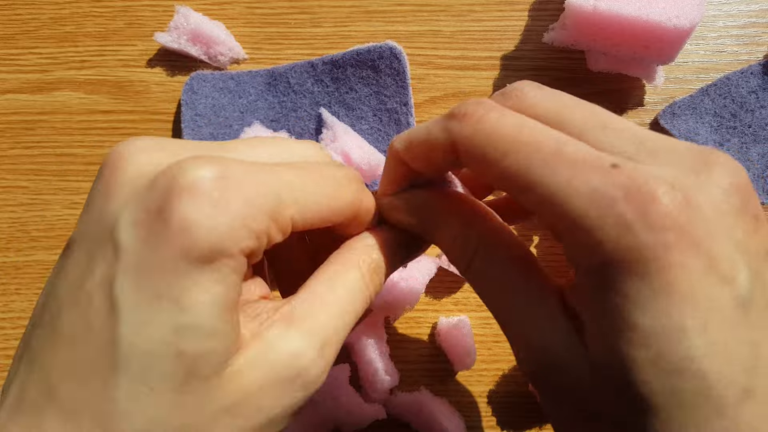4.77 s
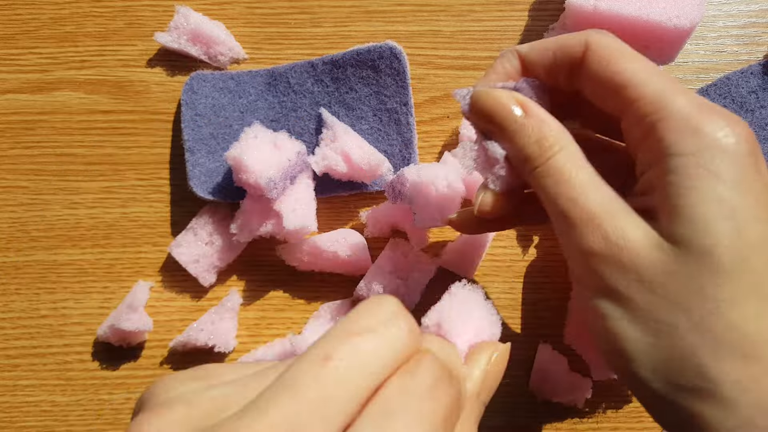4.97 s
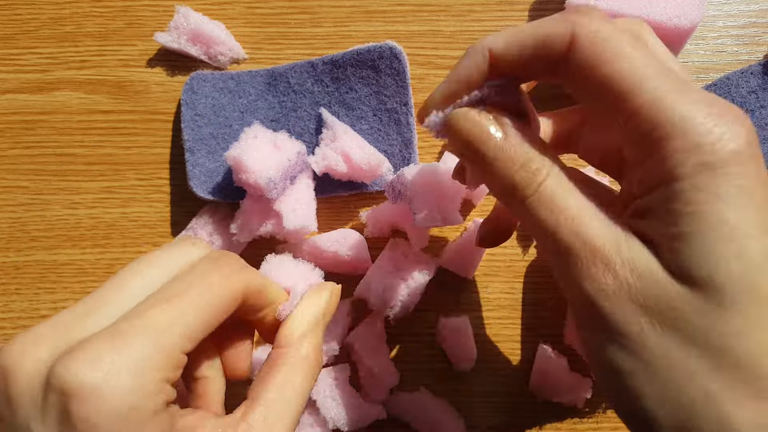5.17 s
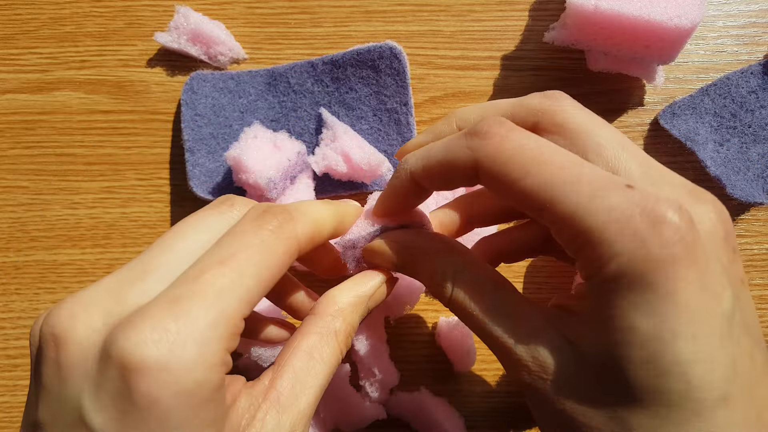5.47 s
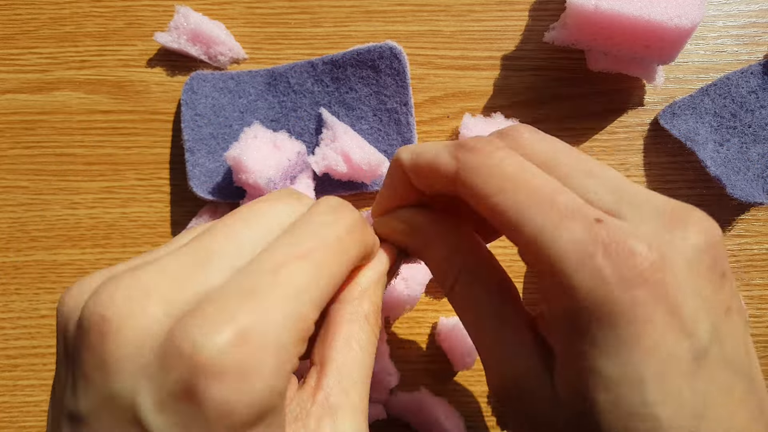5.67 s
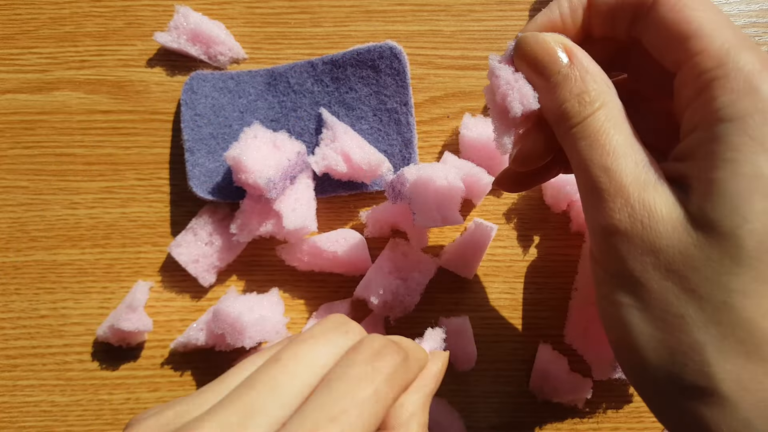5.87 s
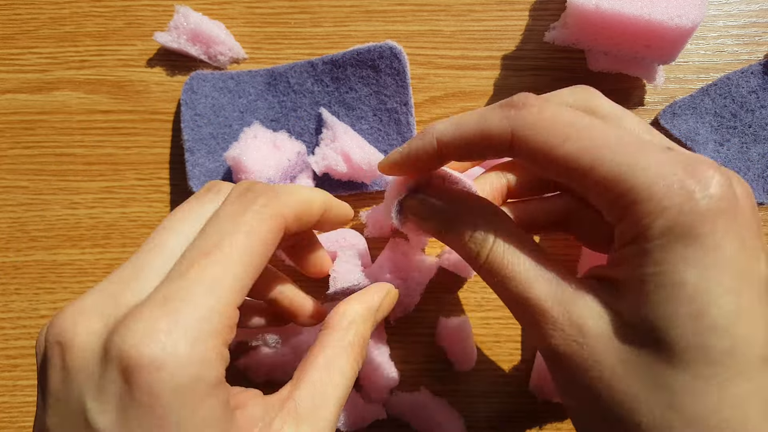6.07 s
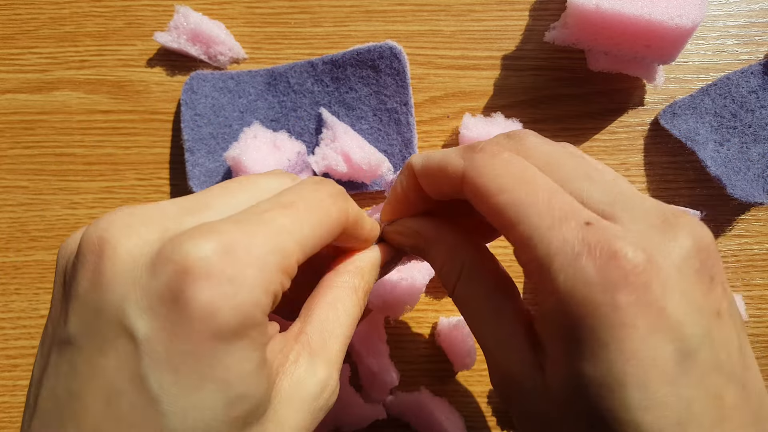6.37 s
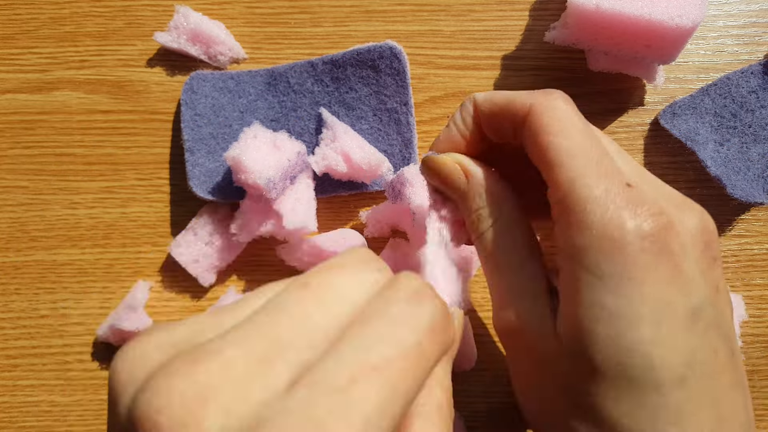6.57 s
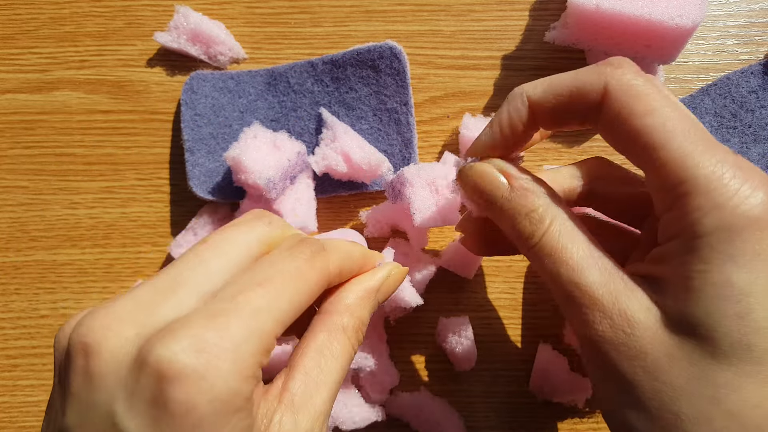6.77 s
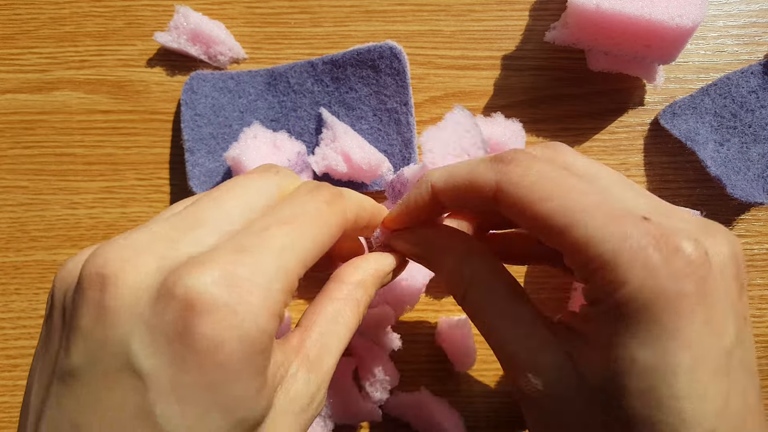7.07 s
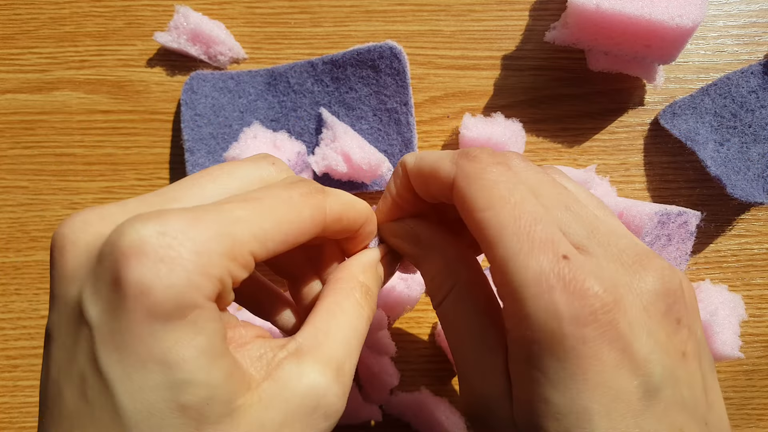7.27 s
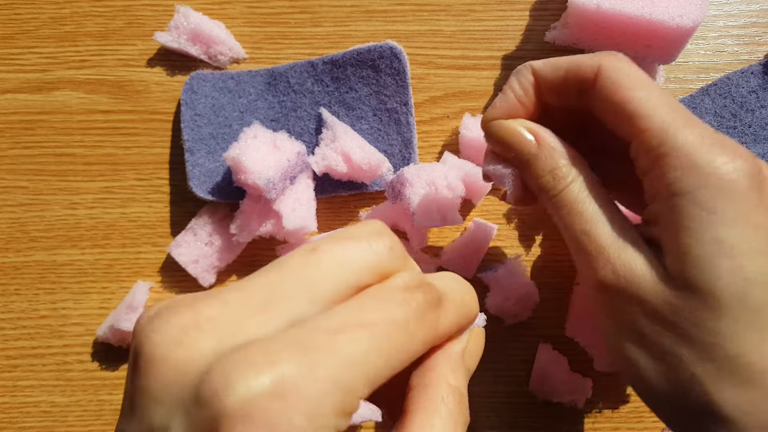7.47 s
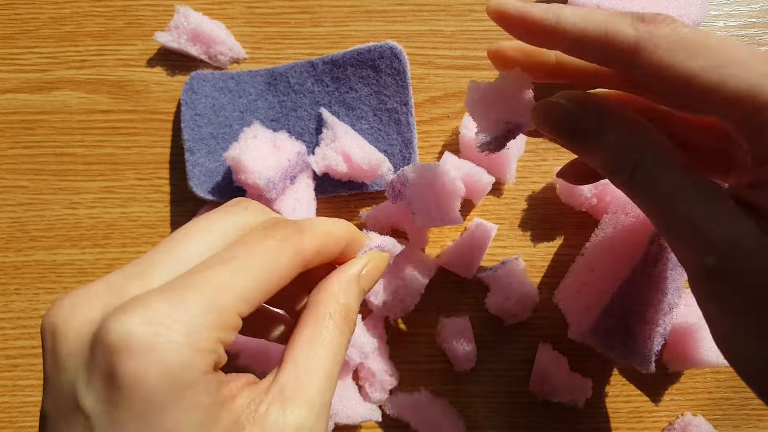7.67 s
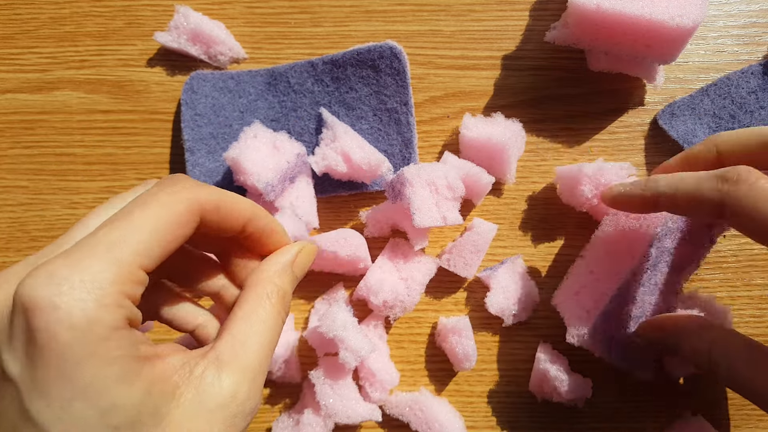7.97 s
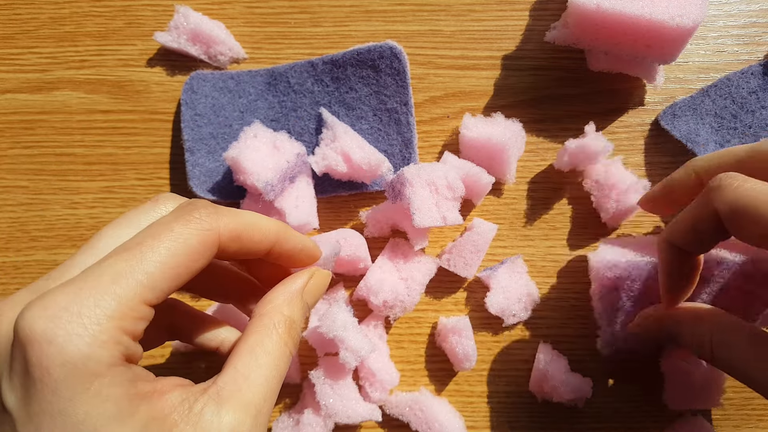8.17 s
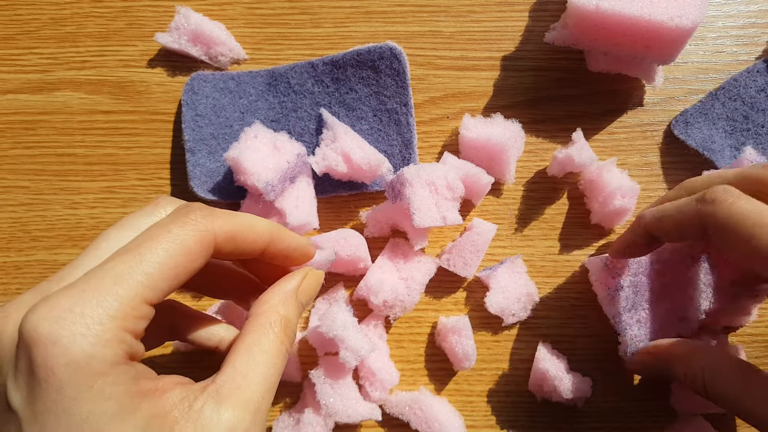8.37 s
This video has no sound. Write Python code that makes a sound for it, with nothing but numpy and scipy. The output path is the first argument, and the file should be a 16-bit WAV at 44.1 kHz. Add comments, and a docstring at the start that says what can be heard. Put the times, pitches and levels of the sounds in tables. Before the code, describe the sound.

Brief sharp rips of dry foam, four in quick succession, then spaced singly, with soft creaky handling over quiet low room rumble.

```python
"""At a wooden table in a quiet room, fingers tear small chunks off dry sponge foam close to a stereo microphone.
Each rip is a dense crackle: random impulses excite short resonances, high for cell walls, lower for coarser parts.
The coarser parts join as the tear proceeds, so the sound darkens; dull jerks are damped modes of hands and table.
Between rips the fingers squeeze and shift foam: fainter crackle and two thin squeaks of narrow-band noise.
Behind lie band-filtered room rumble and hiss, a steady motor hum and a far engine, a sine of gliding pitch."""
import sys
import numpy as np
from scipy import signal
from scipy.io import wavfile

SR = 44100
rng = np.random.default_rng(int(sys.argv[2]) if len(sys.argv) > 2 else 0)


def field_ratio(decibels):
    """Amplitude ratio for a level in dB (20 dB per decade); scalars and array-likes work."""
    return 10 ** (np.asarray(decibels, dtype=float) / 20)


def transcribe(signal):
    """Save signal, clipped to [-1, 1], as a 16-bit WAV file at the path in sys.argv[1]."""
    frames = np.atleast_2d(signal).T
    limited = np.clip(frames, -1, 1)
    pcm = np.round(limited * 32767).astype(np.int16)
    wavfile.write(sys.argv[1], SR, pcm)


N = 376173

# Spectral density of the room air and microphone hiss: (f/Hz, relative level/dB)
AIR_SPECTRUM = [(24, -27), (40, 4), (101, -1), (175, -3.5), (267, -9), (398, -9), (821, -13), (10500, -30),
                (13100, -27.5), (15600, -33)]
# Left-right correlation of the background: (f/Hz, correlation)
AIR_CORRELATION = [(60, .25), (250, .5), (2500, 0.0)]
# Noise bands of a steady motor: (f/Hz, bandwidth/Hz, level/dB)
HUM_BANDS = [(41.5, 7, -60.5), (90.8, 7.4, -58.5), (267.5, 62, -60.5)]
# Gliding note of a far engine: (t/s, f/Hz, level/dB)
ENGINE_GLIDE = [(2.5, 123.4, -65), (3.81, 121.1, -59), (4.23, 104, -65), (4.6, 113, -67), (5.2, 100, -70.5),
                (6.15, 122.2, -59), (6.5, 113.1, -50), (6.93, 126, -70), (7.39, 103.4, -57.5),
                (7.82, 119.3, -64), (8.23, 110.8, -54), (8.53, 124.3, -63)]
# A strained strut slips and sings: (t/s, length/s, f/Hz, onset level/dB)
STRUT_SQUEAKS = [(0.108, .09, 4180, -48.5), (0.787, 0.16, 2250, -48.5)]
# Fingers squeeze and shift foam: (peak t/s, rise/s, fall/s, cell wall level/dB, finger rub level/dB)
FOAM_SQUEEZES = [(0.0, .01, 0.033, -45, -40.5), (0.112, 0.028, 0.13, -53, -55),
                 (0.819, 0.06, 0.063, -53, -42.5), (1.054, 0.14, 0.078, -49.5, -52),
                 (1.269, 0.076, 0.041, -60.5, -55), (1.495, 0.018, 0.086, -47, -43),
                 (1.59, 0.09, 0.055, -49.5, -46.5), (1.756, 0.18, 0.071, -52.5, -59),
                 (2.39, .1, .06, -52.5, -55), (2.49, 0.061, 0.067, -51, -54),
                 (2.757, 0.022, 0.12, -50, -45), (3.07, 0.21, 0.057, -52, -59.5),
                 (3.371, .04, 0.049, -45, -60), (3.399, 0.049, 0.033, -44, -47),
                 (3.44, 0.026, 0.13, -52.5, -53), (3.552, 0.052, 0.027, -55, -53),
                 (3.705, 0.041, 0.042, -52, -41), (3.85, 0.24, 0.03, -55.5, -60),
                 (4.03, .03, 0.095, -55, -54.5), (4.238, 0.13, 0.12, -49, -55),
                 (4.446, 0.13, 0.047, -54.5, -52.5), (4.63, 0.066, 0.028, -56, -51.5),
                 (4.71, 0.11, 0.057, -49.5, -49.5), (4.885, 0.16, 0.022, -50, -61.5),
                 (5.244, .04, 0.063, -44.5, -47.5), (5.305, 0.044, 0.033, -46.5, -52),
                 (5.54, 0.062, 0.041, -52.5, -46), (5.635, 0.087, 0.018, -48, -48),
                 (5.734, .03, 0.061, -48.5, -58), (6.073, 0.058, 0.059, -43.5, -50),
                 (6.33, 0.26, 0.22, -58, -58), (6.541, 0.1, 0.15, -49.5, -56),
                 (6.847, 0.071, 0.12, -45.5, -49), (6.981, .04, 0.029, -51.5, -51),
                 (7.09, 0.029, .03, -54.5, -50), (7.43, 0.23, .03, -52.5, -59.5),
                 (7.691, 0.0098, 0.041, -40, -48.5), (7.765, 0.013, 0.027, -42.5, -67),
                 (8.161, 0.043, .05, -47.5, -50.5), (8.223, .06, 0.021, -43.5, -47),
                 (8.345, 0.033, .03, -51.5, -51), (8.455, 0.056, .1, -51.5, -45.5)]
# A chunk comes free or a finger knocks the table: (t/s, relative level/dB, lift of the upper modes/dB)
JERK_EVENTS = [(0.766, -2.5, 3), (1.886, -23, 10.5), (2.083, -9.5, 1), (2.39, -46, 13), (2.476, -51, 4),
               (2.74, -35.5, -14), (3.182, -22, 2), (3.394, -34.5, 5), (3.98, -24, 3), (4.016, -32.5, -8),
               (4.266, -37, -6), (4.613, -52, 17), (5.043, -24, 2), (5.855, -31.5, 18.5), (6.044, -48, 15),
               (6.108, -55, 20), (6.181, -53, 11), (6.681, -23.5, 5), (7.532, -44, 8), (8.1, -39, -1),
               (8.324, -27, -15), (8.338, -27, -22)]
# Modes a jerk excites in hands and table: (f/Hz, relative level/dB, 60 dB decay time/s)
TABLE_MODES = [(161, -23.5, 0.15), (221, 0.5, 0.063), (302, 2.5, 0.043), (814, 3, 0.018),
               (1040, -10.5, 0.06), (2180, 2.5, 0.012), (2900, -2, 0.0082)]
# A bundle of cell walls snaps at once: (t/s, relative level/dB, f/Hz)
BUNDLE_SNAPS = [(0.109, -29, 4200), (0.159, -21, 3870), (0.4433, -26.5, 7700), (0.4577, -19.5, 2950),
                (0.485, -25, 2620), (0.537, -15.5, 3450), (0.693, -29, 3480), (1.76, -36, 10000),
                (1.7953, -26.5, 11300), (1.993, -21, 6000), (3.105, -16, 9000), (3.1238, -9.5, 9000),
                (3.8925, -15, 9640), (3.9202, -4.5, 4330), (4.6114, -34, 2970), (4.923, -33, 9070),
                (4.96, -16.5, 9000), (4.9758, -9, 9100), (5.737, -38, 9000), (5.768, -33.5, 9100),
                (5.8058, -17, 9800), (6.4432, -32, 9300), (6.478, -36.5, 9080), (6.515, -34, 9020),
                (6.539, -29.5, 8860), (6.588, -23, 9050), (6.8448, -21, 11200), (7.429, -36, 9100),
                (7.446, -42, 9000), (7.465, -22, 9000), (7.693, -27.5, 8100)]
# Left-right correlation of the foam: (f/Hz, correlation)
FOAM_CORRELATION = [(120, 0.099), (280, 1), (1000, 0.59), (2500, 0.32), (5000, 0.017)]
# Resonances of the air between hands and table: (f/Hz, bandwidth/Hz, level added/dB)
CAVITY_MODES = [(850, 54, -21), (2210, 28, 2), (2750, 215, -3.5)]
# Rips: (full strength t/s, then to the thickest strands/s, full strength to the parting/s, cell wall level/dB,
# sag until the parting/dB, build-up/(dB/s), bulk of the chunk/dB, full strength to the struts/s)
RIP_EVENTS = [(0.223, .005, 0.09, -20.5, 2.5, 272, 0, -.06), (0.485, 0.024, 0.032, -33, 5.5, 244, -1, .01),
              (0.551, 0.0034, 0.07, -22, 11.5, 595, -3, 0.01),
              (0.723, 0.036, 0.047, -30, -10.5, 600, 5.5, -0.029),
              (1.812, 0.049, 0.13, -24, 0, 695, 1, 0.041), (2.023, 0.0033, 0.067, -27, -7, 369, 6, 0.0021),
              (3.113, 0.0616, 0.068, -23, -0.5, 796, 1, 0.053),
              (3.887, 0.095, 0.093, -23, -1, 1196, 0, 0.055),
              (4.976, 0.0715, 0.074, -21, 3, 600, -2, 0.058),
              (5.808, 0.063, 0.07, -27.5, -2, 698, -6.5, 0.058),
              (6.62, 0.059, 0.064, -25, 0.5, 340, -4, 0.069),
              (7.495, 0.04, 0.036, -30, -2, 360, -7, 0.0088)]
# Struts, strands and chunk body trail the walls until the tear reaches them:
# (catching up/(dB/s), offset from the walls once joined/dB, share of the bulk)
COARSER_JOINING = [(273, -4, 0.37), (318, -3.5, 0.13), (577, -5.5, 0.81)]

# sizes of breaking foam: (lowest f/Hz, highest f/Hz, cycles rung in a 60 dB decay, tilt/(dB/octave))
WALLS, STRUTS = (6000, 14100, 4.4, 1.9), (1880, 4600, 9.6, 0.1)
STRANDS, BODY = (750, 1843, 8.3, 0.14), (144, 557, 3.6, 0.18)
# mean breaks per second, in rips and in handling
FINE_RIP_PER_S, FINE_HANDLING_PER_S = 13750, 20000
COARSE_RIP_PER_S, COARSE_HANDLING_PER_S = 3300, 4800
AIR_LEVEL_DB = -52   # rms
SQUEAK_WIDTH_HZ = 300
SQUEEZE_FADE_DB = 15   # lost over one rise or fall time
GRIP_WALLS_DB, GRIP_RUB_DB, GRIP_WAVER_DB = -69, -75.5, 6   # held foam never stops creaking
# after the parting: steep release, then a slower tail starting at SETTLE_DB
LET_GO_DB_PER_S, SETTLE_DB, SETTLE_DB_PER_S = 1088, -19.5, 220
BODY_LATE = 1.054   # wait for the body over the wait for the strands
LEFT_DB, RIGHT_LAG_S = 0.5, 7e-5   # left raised and right lowered by LEFT_DB
LEVEL_STEP = 40   # samples between computed event levels


def rms_one(x):
    """Normalisation: unit root-mean-square value."""
    return x / np.sqrt(np.mean(x ** 2) + 1e-20)


def at_hz(points, hz):
    """Linear interpolation on a logarithmic frequency axis."""
    points = np.array(points)
    return np.interp(np.log(hz), np.log(points[:, 0]), points[:, 1])


def drift(rate_hz):
    """Slow random fluctuation of unit rms: noise through a critically damped two-pole low-pass."""
    r = np.exp(-2 * np.pi * rate_hz * 16 / SR)   # computed at every 16th sample
    noise = rng.standard_normal(N // 16 + 4002)
    slow = signal.lfilter([1], [1, -2 * r, r * r], noise)[4000:]   # without the settling
    return np.interp(np.arange(N) / 16, np.arange(len(slow)), rms_one(slow))


def ring(x, hz, t60):
    """Damped oscillator: a unit impulse starts a decaying sine of unit amplitude."""
    r, w = field_ratio(-60 / (t60 * SR)), 2 * np.pi * hz / SR
    return signal.lfilter([0, np.sin(w)], [1, -2 * r * np.cos(w), r * r], x + 1e-18)


def resonance(x, hz, width_hz):
    """Two-pole resonance: a band of about unit gain at its top."""
    r = np.exp(-np.pi * width_hz / SR)
    top = np.array([1, 0, -1]) * (1 - r * r) / 2
    return signal.lfilter(top, [1, -2 * r * np.cos(2 * np.pi * hz / SR), r * r], x)


def pair(mid_side, alike):
    """Partial correlation: left and right formed from a shared and an opposed part."""
    alike = np.clip(alike, -1, 1)
    shared = np.sqrt(1 + alike) * mid_side[0]
    opposed = np.sqrt(1 - alike) * mid_side[1]
    return shared + opposed * np.array([[1], [-1]])


def power_sum(db):
    """Incoherent superposition: powers, not amplitudes, add."""
    return 10 * np.log10(np.sum(10 ** (db / 10), axis=0) + 1e-12)


def time_from(s):
    """Event clock: time in seconds counted from each event."""
    return np.arange(0, N + LEVEL_STEP, LEVEL_STEP) / SR - s


def level_curve(events_db):
    """Superposition of all events as one level, interpolated to every sample."""
    db = power_sum(events_db)
    return np.interp(np.arange(N) / LEVEL_STEP, np.arange(len(db)), db)


def air():
    """Broadband noise: room rumble and microphone hiss as adjoining bands, each flickering a little."""
    out, edges = 0, np.geomspace(22, 17000, 17)
    white = rng.standard_normal((2, 2, N))   # neighbouring bands take different noise
    for k, (low, high) in enumerate(zip(edges, edges[1:])):
        sos = signal.butter(2, [low, high], "band", fs=SR, output="sos")
        band = signal.sosfilt(sos, white[k % 2])
        hz = np.sqrt(low * high)
        gain = field_ratio(at_hz(AIR_SPECTRUM, hz) + 1.0 * drift(2.2))
        out = out + gain * pair(band, at_hz(AIR_CORRELATION, hz))
    return field_ratio(AIR_LEVEL_DB) * rms_one(out)


def motors():
    """Narrow-band noise wavers as a steady hum; phase integration makes a far engine's note glide."""
    noise = rng.standard_normal((2, N))
    hum = 0
    for hz, width, db in HUM_BANDS:
        hum = hum + field_ratio(db) * rms_one(resonance(resonance(noise, hz, width), hz, width))
    hum = pair(hum, at_hz(AIR_CORRELATION, 90)) / np.sqrt(2)
    s, hz, db = np.transpose(ENGINE_GLIDE)
    t = np.arange(N) / SR
    phase = 2 * np.pi * np.cumsum(np.interp(t, s, hz)) / SR
    note = np.sqrt(2) * np.sin(phase + np.array([[.6], [-.6]]))   # left leads by 1.2 rad
    fade_in = np.clip((t - s[0]) / 0.26, 0, 1)
    wavering = field_ratio(2.5 * drift(5))
    return hum + fade_in * wavering * field_ratio(np.interp(t, s, db)) * note


def squeaks():
    """Stick-slip: slipping noise in a narrow band, starting at once and fading linearly."""
    t = np.arange(N) / SR
    noise = pair(rng.standard_normal((2, N)), 0.8)
    out = 0
    for s, length, hz, db in STRUT_SQUEAKS:
        thin = resonance(resonance(noise, hz, SQUEAK_WIDTH_HZ), hz, SQUEAK_WIDTH_HZ)
        fade = (t > s) * np.clip(1 - (t - s) / length, 0, 1)
        out = out + field_ratio(db) * fade * rms_one(thin)
    return out


def jerks():
    """Modal excitation: each soft jerk strikes every mode with its own random strength and side."""
    s, level_db, bright_db = np.transpose(JERK_EVENTS)
    chance, out = rng.normal(0, 1, (len(s), 2, len(TABLE_MODES))), np.zeros((2, N))
    for k, (hz, mode_db, t60) in enumerate(TABLE_MODES):
        clicks = np.zeros((2, N))
        lean_db = 1.2 * chance[:, 1, k] * np.array([[1], [-1]])
        strength_db = level_db + mode_db - 7 + bright_db * (hz > 600) + 2.0 * chance[:, 0, k]
        clicks[:, (s * SR).astype(int)] = field_ratio(strength_db + lean_db)
        out += resonance(ring(clicks, hz, t60), hz, hz)   # a soft push swells over a cycle
    return out


def snaps():
    """Impulsive release: a noise burst dies in milliseconds, broad with a bump at the bundle's pitch."""
    out, size = np.full((2, N), 1e-18), SR // 25
    dying = field_ratio(-60 * np.arange(size) / (.022 * SR))   # 60 dB in 22 ms
    noises = rng.standard_normal((len(BUNDLE_SNAPS), 2, size))
    for (s, level_db, hz), noise in zip(BUNDLE_SNAPS, noises):
        burst = pair(noise, 0.074) * dying
        bump = 2.5 * resonance(burst, hz, .25 * hz)
        i = round(s * SR)
        out[:, i:i + size] += field_ratio(level_db - 10) * (burst + bump)
    return signal.sosfilt(signal.butter(2, 2500, "high", fs=SR, output="sos"), out)


def squeeze_levels():
    """Envelope superposition: each squeeze swells to its peak and fades, over the creak of the grip."""
    s, rise, fall, walls_db, rub_db = np.transpose(FOAM_SQUEEZES)[:, :, None]
    t = time_from(s)
    shape = -SQUEEZE_FADE_DB * np.maximum(-t / rise, t / fall) ** 1.1
    waver = GRIP_WAVER_DB * drift(1.3)
    walls = power_sum(np.array([level_curve(walls_db + shape), GRIP_WALLS_DB + waver]))
    rub = power_sum(np.array([level_curve(rub_db + shape), GRIP_RUB_DB + waver]))
    return walls, rub


def rip_levels():
    """Progressive fracture: walls build up, sag and let go; coarser sizes trail until the tear reaches them."""
    s, strands_s, hold, db, sag_db, rise, bulk_db, struts_s = np.transpose(RIP_EVENTS)[:, :, None]
    t = time_from(s)
    after = np.maximum(t - hold, 0)
    release = np.maximum(-LET_GO_DB_PER_S * after, SETTLE_DB - SETTLE_DB_PER_S * after)
    walls = db + rise * np.minimum(t, 0) - sag_db * np.clip(t / hold, 0, 1) + release
    levels = [level_curve(walls)]
    waits = (struts_s, strands_s, BODY_LATE * strands_s)
    for wait, (catch_up, joined_db, bulk_share) in zip(waits, COARSER_JOINING):
        trailing = catch_up * np.maximum(wait - t, 0)
        levels.append(level_curve(walls + joined_db + bulk_share * bulk_db - trailing))
    return levels


def breaks(per_s, spread_db, clump_db):
    """Clustered random impulses, a few much stronger; shared and opposed parts have common instants."""
    strength_db = spread_db * np.minimum(rng.exponential(1, N), 5)
    sizes = field_ratio(strength_db + clump_db * drift(61))
    born = rng.random(N) < per_s / SR
    return sizes * born * rng.standard_normal((2, N))


def crackle(clicks, size, count, patchy_db):
    """Shock excitation: breaks are dealt to short resonators of one foam size, each flaring by itself; rms 1."""
    low_hz, high_hz, cycles, tilt_db = size
    dealt, out = rng.integers(0, count, N), 0
    for k, hz in enumerate(np.geomspace(low_hz, high_hz, count)):
        gain = field_ratio(tilt_db * np.log2(hz / low_hz) + patchy_db * drift(21.8))
        gain = gain * np.sqrt(hz)   # makes up for the shorter ring of higher pitches
        rung = ring(gain * clicks * (dealt == k), hz, cycles / hz)
        out = out + pair(rung, at_hz(FOAM_CORRELATION, hz))
    # each size radiates little far from its own pitch
    edges = [0.61 * low_hz, min(1.22 * high_hz, .45 * SR)]
    return rms_one(signal.sosfilt(signal.butter(2, edges, "band", fs=SR, output="sos"), out))


def foam():
    """Fracture noise: rips break walls, struts and strands and shake the chunk; squeezing only creaks."""
    walls_db, struts_db, strands_db, body_db = rip_levels()
    squeeze_db, rub_db = squeeze_levels()
    ripping = walls_db > squeeze_db
    fine_per_s = np.where(ripping, FINE_RIP_PER_S, FINE_HANDLING_PER_S)
    coarse_per_s = np.where(ripping, COARSE_RIP_PER_S, COARSE_HANDLING_PER_S)
    fine = breaks(fine_per_s, spread_db=0.5, clump_db=1.0)
    coarse = breaks(coarse_per_s, spread_db=1.0, clump_db=2.0)
    walls_db = np.maximum(walls_db, squeeze_db)
    struts_db = np.maximum(struts_db, (squeeze_db + rub_db) / 2 - 3.0)
    strands_db = np.maximum(strands_db, rub_db)
    walls = field_ratio(walls_db) * crackle(fine, WALLS, count=7, patchy_db=2.5)
    struts = field_ratio(struts_db) * crackle(coarse, STRUTS, count=5, patchy_db=1.5)
    strands = field_ratio(strands_db) * crackle(coarse, STRANDS, count=5, patchy_db=3.5)
    body = field_ratio(body_db) * crackle(coarse, BODY, count=5, patchy_db=-0.5)
    middle = struts + strands
    cavity = sum(field_ratio(db) * resonance(middle, hz, width) for hz, width, db in CAVITY_MODES)
    return walls + field_ratio(2) * (middle + cavity) + body


def scene():
    """Stereo by level and arrival time: the hands sit a little nearer the left microphone."""
    hands = foam() + squeaks() + snaps() + jerks()
    t = np.arange(N)
    left = field_ratio(LEFT_DB) * hands[0]
    right = field_ratio(-LEFT_DB) * np.interp(t - RIGHT_LAG_S * SR, t, hands[1])
    return np.array([left, right]) + air() + motors()


def top_cut(x):
    """Nothing passes above the cut-off."""
    return signal.sosfilt(signal.butter(12, 15780, fs=SR, output="sos"), x)


def record(dry):
    """Band limitation: the microphone drops the deep bass, the top is cut, peaks clip at full scale."""
    thin = signal.sosfilt(signal.butter(2, 30, "high", fs=SR, output="sos"), dry)
    # 60 dB down from 16500 Hz upward
    cut = signal.sosfilt(signal.cheby2(12, 60, 16500, fs=SR, output="sos"), thin)
    mix = np.clip(cut, -1, 1)
    return top_cut(mix)


dry = scene()
out = record(dry)
transcribe(out)
```